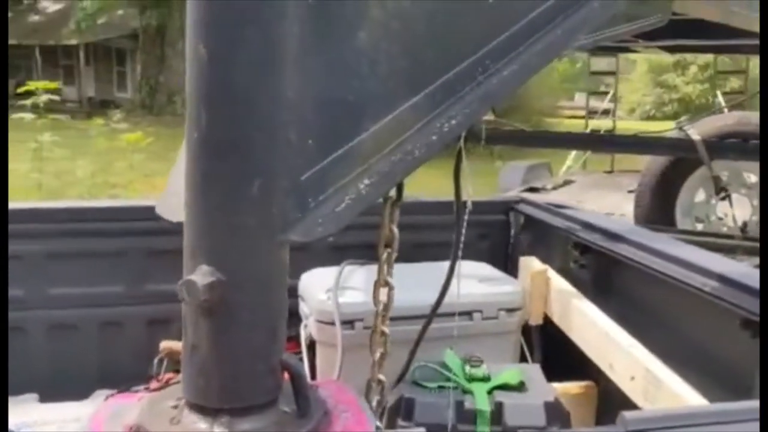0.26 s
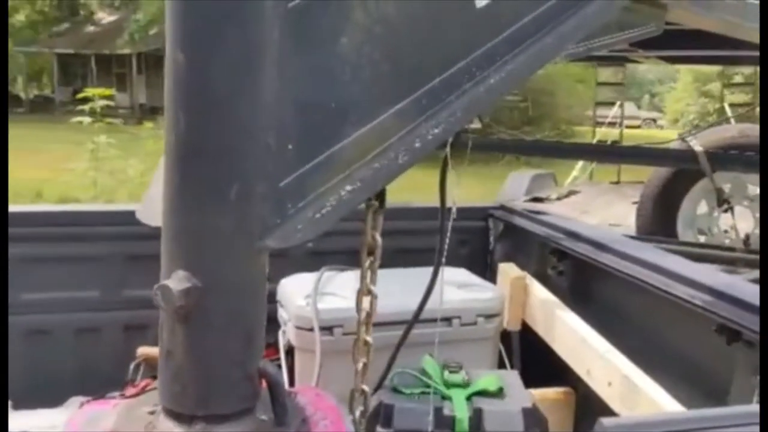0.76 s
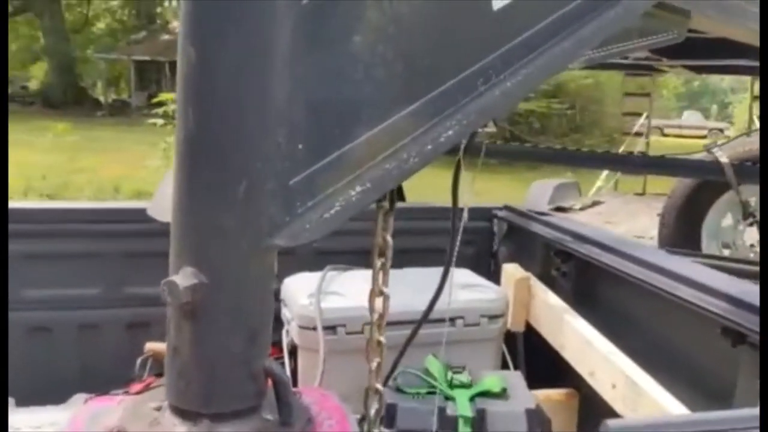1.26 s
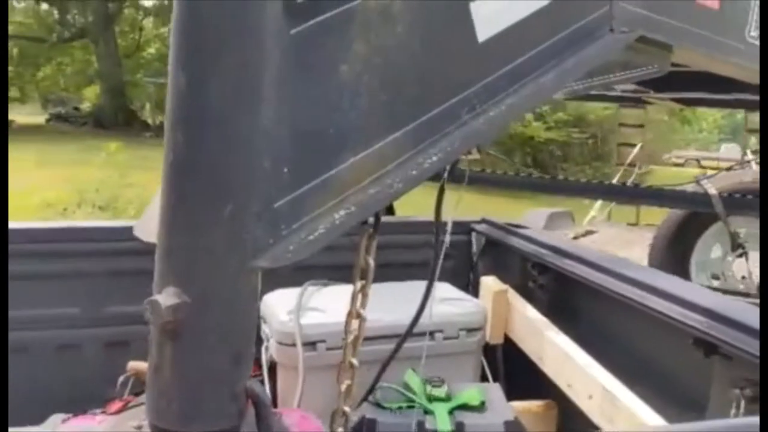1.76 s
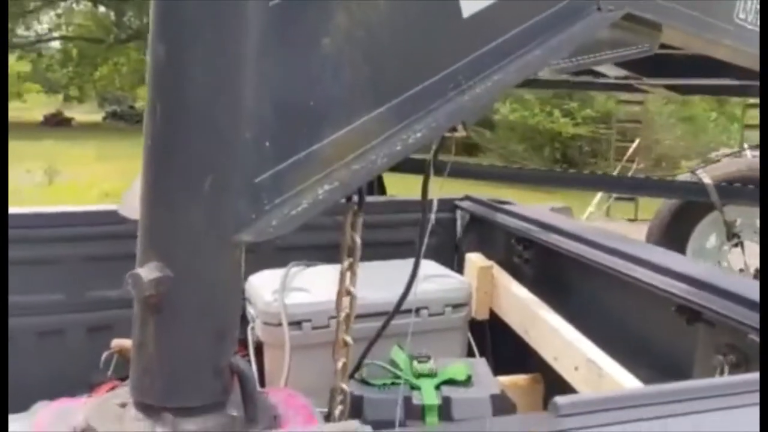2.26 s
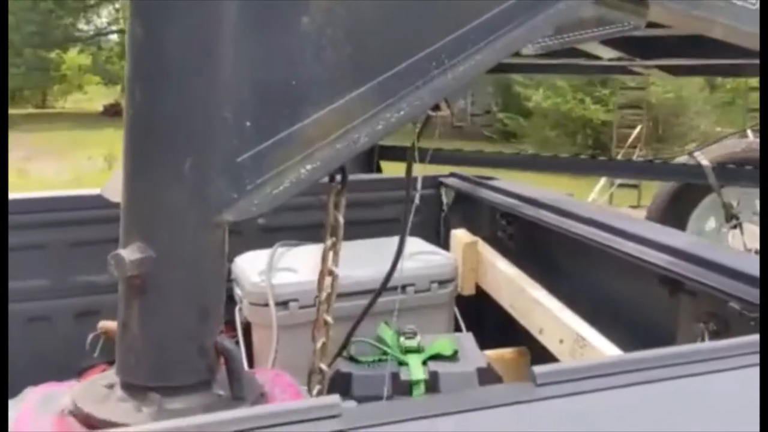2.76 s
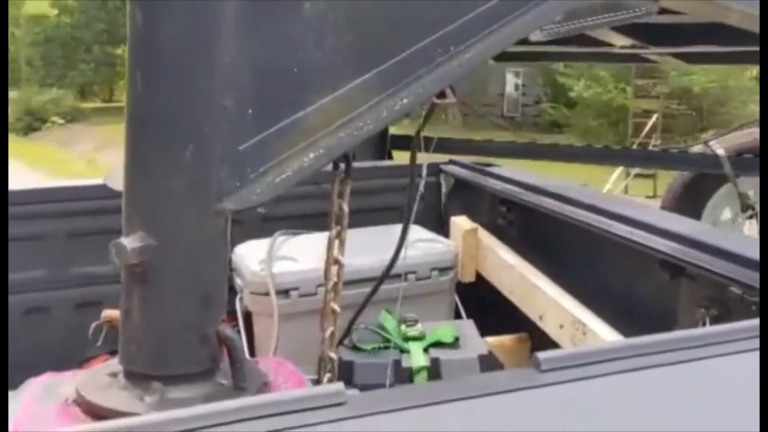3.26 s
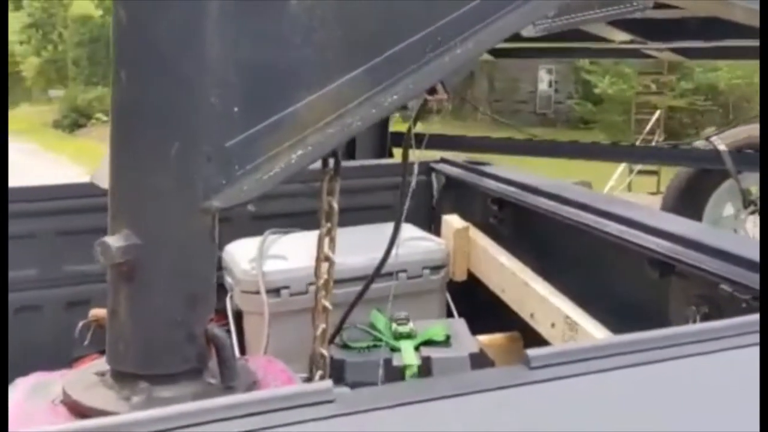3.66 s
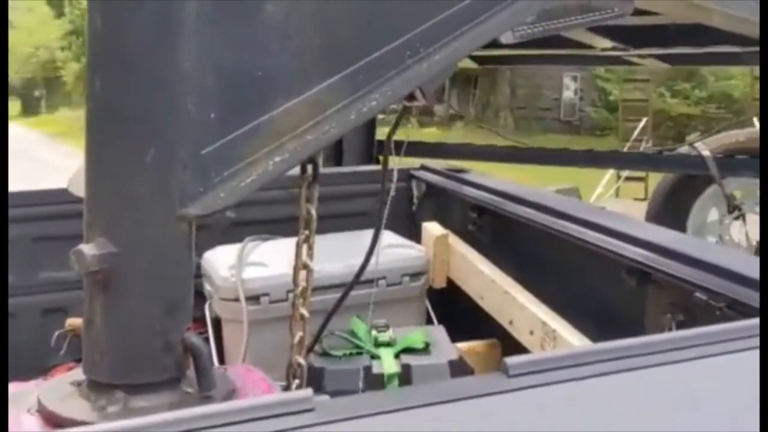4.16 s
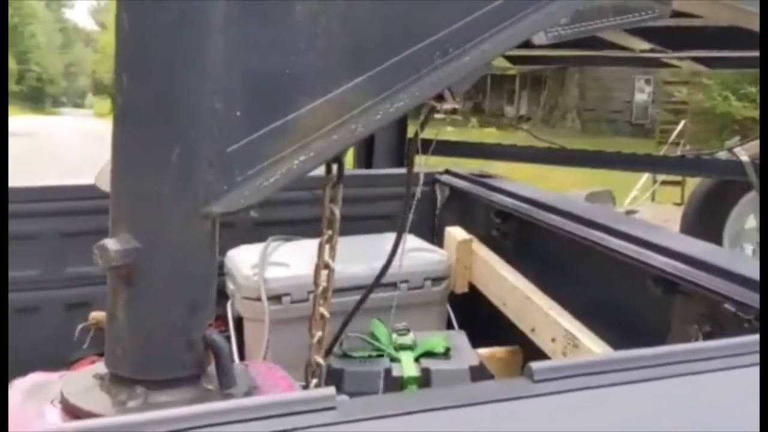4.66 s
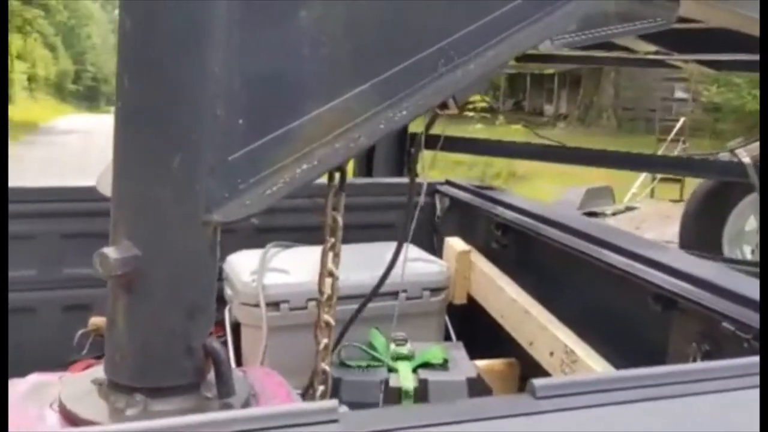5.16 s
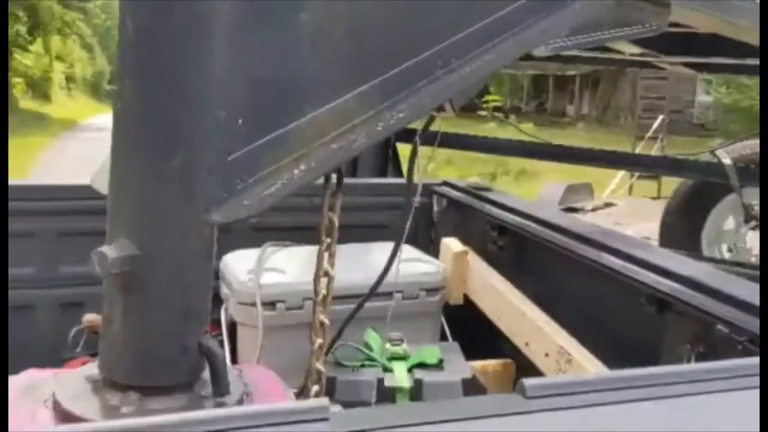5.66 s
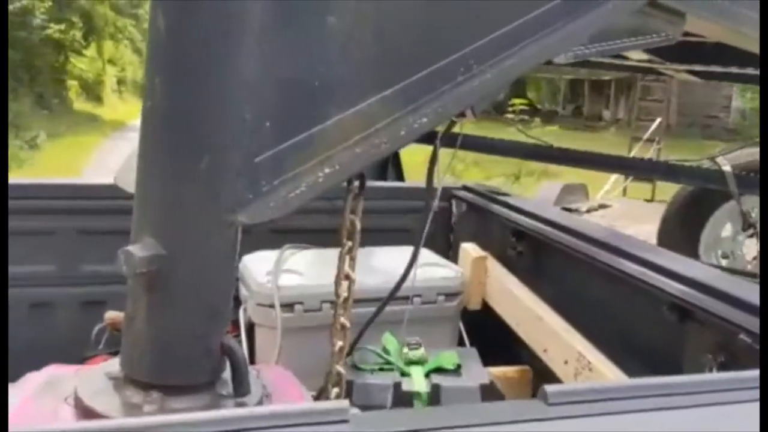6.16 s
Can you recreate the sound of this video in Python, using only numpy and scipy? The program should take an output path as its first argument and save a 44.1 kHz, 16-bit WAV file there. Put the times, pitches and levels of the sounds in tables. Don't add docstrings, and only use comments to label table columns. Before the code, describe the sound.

A truck tows a trailer down a lane: deep throbbing engine, tyre rumble, airy hiss, loose steel knocking and a brief high squeak.

```python
import sys
import numpy as np
from scipy import signal
from scipy.fft import rfft, irfft, next_fast_len
from scipy.io import wavfile
from scipy.ndimage import uniform_filter1d

SR = 44100
rng = np.random.default_rng(int(sys.argv[2]) if len(sys.argv) > 2 else 0)


def waveform_to_disk(signal):
    frames = np.transpose(np.atleast_2d(signal))
    scaled = np.clip(frames, -1, 1) * 32767
    samples = np.round(scaled).astype(np.int16)
    wavfile.write(sys.argv[1], SR, samples)


def decibels_to_gain(level_db):
    exponent = np.asarray(level_db, float) / 20
    return 10 ** exponent


N = 282681


def evened(x):
    return x / np.sqrt(np.mean(x ** 2) + 1e-20)


def read(points, hz):
    point_hz, value = np.transpose(points)
    return np.interp(np.log(hz + 1), np.log(point_hz + 1), value)


def play(rows):
    s, *columns = np.transpose(rows)
    t = np.arange(s[0], s[-1], 1 / SR)
    return s[0], [np.interp(t, s, column) for column in columns]


def add(mix, start_s, sound):
    part = mix[..., round(start_s * SR):][..., :sound.shape[-1]]
    part += sound[..., :part.shape[-1]]


def colour(points):
    log_gain = np.log(decibels_to_gain(read(points, abs(np.fft.fftfreq(4096, 1 / SR)))))
    return np.fft.ifft(np.exp(np.conj(signal.hilbert(log_gain)))).real[:2048]


def ring(modes, detune=0.96):
    t = np.arange(SR // 4) / SR
    return sum(decibels_to_gain(db - 60 * t / max(t60_s, .01)) * np.sin(2 * np.pi * hz * detune * t)
               for hz, db, t60_s in modes)


def wander(hz, count):
    r = np.exp(-2 * np.pi * hz / SR)
    drift = signal.lfilter([1], [1, -2 * r, r * r], rng.standard_normal(count + SR))
    return evened(drift[SR:])


# time in seconds, level over its mean in dB.
TYRE_CURVE = [(0.0, 1.5), (0.5, -0.5), (0.93, 1.5), (1.82, 0), (2.27, -2.5), (2.93, -3.5), (3.2, 0.5),
              (3.6, -1.5), (4.3, 0), (4.7, 3), (5.14, 1.5), (5.95, 2.5), (6.12, 1), (6.41, 3.5)]
# mean in dB, share of the tyre noise swing, slope in dB per octave of engine speed.
ROAD_LAYERS = [
    (-33, 0.31, 6.5),
    (-41, 0.76, 2),
    (-33.5, 0.93, 1),
]


def layers_db():
    tyres_db = play(TYRE_CURVE)[1][0]
    firing_hz = play(FIRING_CURVE)[1][0]
    octaves = np.log2(firing_hz / 52)
    return [db + share * tyres_db + per_octave_db * octaves for db, share, per_octave_db in ROAD_LAYERS]


# frequency in Hz, correlation -1 to 1.
LIKENESS = [(60, 1), (150, 0.47), (300, 0.81), (600, 0.88), (950, 0.97), (1300, 0.48), (1650, 0.92),
            (2200, 0.37), (5000, 0.13)]


def noise(spectrum, level_db, size, patchy_db, flicker_db):
    hop = size // 4
    frames, hz = N // hop + 5, np.fft.rfftfreq(size, 1 / SR)
    a, b, c, d, patches = rng.standard_normal((frames, len(hz), 5)).T
    patches = uniform_filter1d(patches, size=6, axis=0)
    patches = evened(uniform_filter1d(patches, size=12, axis=1))
    flicker = evened(uniform_filter1d(rng.standard_normal(frames), size=5))
    same = np.clip(read(LIKENESS, hz), -1, 1)[:, None]
    left = a + 1j * b
    right = same * left + np.sqrt(1 - same ** 2) * (c + 1j * d)
    gain_db = read(spectrum, hz)[:, None] + patchy_db * patches + flicker_db * flicker
    z = np.array([left, right]) * decibels_to_gain(gain_db)
    x = evened(signal.istft(z, nperseg=size, noverlap=size - hop)[1][:, :N])
    return x * decibels_to_gain(np.pad(level_db, (0, N), "edge")[:N])


# frequency in Hz, level in dB.
RUMBLE_SPECTRUM = [(25, -32), (38, -23.5), (65, 8), (95, -0.5), (140, -9), (190, -9.5), (230, -15.5),
                   (320, -13.5), (420, -28), (700, -64.5)]
ROAR_SPECTRUM = [(200, -12.5), (380, -0.5), (550, 2.5), (800, 0), (1050, 3.5), (1230, -5), (1400, 0.5),
                 (1620, -7), (1800, -4.5), (2400, -43)]
HISS_SPECTRUM = [(1500, -20), (1950, -2.5), (2500, 2.5), (3100, -6), (3500, -11), (4200, -12),
                 (5000, -15.5), (5700, -20.5), (6500, -25), (8000, -26.5), (10000, -21.5), (11000, -30),
                 (12600, -25), (13300, -66)]


def road():
    rumble_db, roar_db, hiss_db = layers_db()
    rumble = noise(RUMBLE_SPECTRUM, rumble_db + 5.0, size=4096, patchy_db=1.5, flicker_db=.5)
    roar = noise(ROAR_SPECTRUM, roar_db + 0.035, size=512, patchy_db=1.5, flicker_db=0.5)
    hiss = noise(HISS_SPECTRUM, hiss_db - 8.0, size=512, patchy_db=1.5, flicker_db=-0.12)
    return rumble + roar + hiss


# start in seconds, level in dB, frequency in Hz, t60 in seconds.
CARGO_THUDS = [(1.149, -34.5, 312, 0.17), (1.932, -34, 317, 0.11), (2.606, -37.5, 234.4, 0.16),
               (3.263, -27.5, 230, 0.089), (3.315, -36, 255, 0.094), (3.523, -37.5, 320, 0.16),
               (4.022, -34.5, 219.7, 0.085), (6.395, -22.5, 249, 0.039)]


def cargo():
    out = np.zeros((2, N))
    for s, level_db, hz, t60_s in CARGO_THUDS:
        thud = ring([(hz, 0, t60_s), (1.396 * hz, -5, 0.45 * t60_s), (2.9 * hz, -10, 0.83 * t60_s)])
        thud *= np.minimum(np.arange(len(thud)) / 85.0, 1)
        add(out, s, decibels_to_gain(level_db + 9.5) * np.array([thud, thud]))
    return out


# peak in dB, rise in seconds, hold in seconds, fall in dB/s, throb in dB.
SQUEAK_PARTIALS = [(-22.5, .012, 0.049, 260, 13.5), (-33.5, 0.028, 0.026, 110, 4),
                   (-51, 0.019, 0.021, 160, -3), (-54, 0.023, 0.0088, 172, 1)]
# gain in dB, phase in radians, fuzz 0-1.
SQUEAK_RIGHT_PORT = [(-4, -1.8, .15), (-5, 2.5, .45), (-2, .3, .8), (-2, .3, .9)]


def squeak():
    out, start_s, t = np.zeros((2, N)), 1.508, np.arange(0, .212, 1 / SR)
    slip_hz, sag_hz_per_s, shake_hz, shake_s = 2092, 250, 52, 0.015
    hz = slip_hz + sag_hz_per_s * (.05 - abs(t - .05))
    slack = np.sin(np.pi * shake_hz * (t - shake_s)) ** 2
    levels_db = []
    for db, rise_s, hold_s, fall, throb_db in SQUEAK_PARTIALS:
        rising_db = 25 * np.maximum(1 - t / rise_s, 0)
        falling_db = fall * np.maximum(t - rise_s - hold_s, 0)
        levels_db.append(db - rising_db - falling_db - throb_db * slack)
    turns = np.cumsum(hz * (1 + 0.0055 * wander(70., len(hz)))) / SR
    for k, (db, (right_db, phase, fuzz)) in enumerate(zip(levels_db, SQUEAK_RIGHT_PORT)):
        shake = decibels_to_gain(db) * (1 + fuzz * (wander(160., len(hz)) + 1j * wander(200.0, len(hz))))
        tone = shake * np.exp(2j * np.pi * (k + 1) * turns)
        right = decibels_to_gain(right_db) * tone * np.exp(1j * phase)
        add(out, start_s, np.array([tone.real, right.real]))
    scrape = signal.fftconvolve(rng.standard_normal((2, len(hz))), colour(CHAIN_SPECTRUM)[None], "same", axes=1)
    add(out, start_s, decibels_to_gain(levels_db[2] - 7.0) * evened(scrape))
    return out


# frequency in Hz, level in dB, t60 in seconds.
LATCH_MODES = [(2346, 3, .08), (2554, -4, 0.064), (1410, -3, .07), (1800, -8, .04)]
# start in seconds, level in dB.
LATCH_PINGS = [(0.028, -18), (0.037, -26), (0.674, -34.5), (0.7557, -28), (1.125, -24), (3.057, -33.5),
               (4.346, -33.5), (6.389, -27)]


def latch():
    out = np.zeros((2, N))
    ping = ring(LATCH_MODES) * np.minimum(np.arange(SR // 4) / 54.0, 1)
    for s, level_db in LATCH_PINGS:
        add(out, s, decibels_to_gain(level_db) * np.array([ping, ping]))
    return out


# frequency in Hz, level in dB, t60 in seconds.
HITCH_MODES = [(1450, -2, .025), (1650, -2, .025), (1850, -2, .025), (2220, -2, .03), (2500, -2, .03),
               (2760, 0, .03), (3020, 0, .03), (3250, -2, .03), (3630, -7, .025), (4150, -8, .025),
               (4650, -10, .02), (4950, -11, .02)]
BED_MODES = [(572, -8, 0.042), (794, -4, 0.081), (866, -1.5, 0.051), (992, -3.5, 0.023), (1159, 3.5, 0.035),
             (1330, -8, 0.059)]
# frequency in Hz, level in dB.
CHAIN_SPECTRUM = [(3500, -20), (5000, 0), (6200, -6), (7300, -1), (9000, -3), (10200, -1), (11000, -5),
                  (12500, -2), (13400, -15)]


def hit(level_db, body_db, tick_db, rattle_s, t60_s):
    t = np.arange(SR // 5) / SR
    clicks = rng.standard_normal((2, len(t))) * decibels_to_gain(4.3 * np.minimum(rng.exponential(1, len(t)), 4))
    clicks *= np.minimum(t / (.15 * rattle_s), 1)
    sharp = min(1, .009 / rattle_s)
    clicks[0, [8, 200]] = clicks[1, [20, 190]] = 20 * sharp, 14 * sharp
    clicks *= decibels_to_gain(-60 * np.maximum(t - rattle_s, 0) / max(t60_s, .01))
    scattered = clicks * decibels_to_gain(np.array([[0.], [-3.5]]))
    detune = rng.uniform(0.96, 1.04)
    clank_band = signal.butter(2, [1300, 5600], "band", fs=SR, output="sos")
    body_band = signal.butter(2, [500, 1800], "band", fs=SR, output="sos")
    clank = signal.sosfilt(clank_band, ring(HITCH_MODES, detune))
    body = signal.sosfilt(body_band, ring(BED_MODES, detune))
    parts = [(scattered, clank, 0), (clicks[[0, 0]], body, body_db + 5),
             (scattered, colour(CHAIN_SPECTRUM), tick_db + 5.5)]
    out = 0
    for source, shape, db in parts:
        rung = signal.fftconvolve(source, shape[None], axes=1)[:, :SR // 5]
        out = out + decibels_to_gain(level_db + db - 11) * rung / np.std(rung[0, :500])
    return out


# start in seconds, clank in dB, body and tick in dB re clank.
SINGLE_BLOWS = [(0.7567, -25.5, -6.5, -52), (1.125, -14, -12, -20.5), (1.1297, -15, -17, -30),
                (1.461, -21.5, -24, -51), (1.555, -21, -13.5, -32), (1.603, -23.5, -9, -36),
                (2.2918, -30, -2.5, -22), (3.0558, -25, 1.5, -52.5), (3.1512, -28, 0.5, -36),
                (3.2, -17.5, -9, -16.5), (3.256, -29.5, -1, -33), (4.347, -31, -30, -42),
                (6.4028, -11.5, -7.5, -25)]
CHAIN_TICKS = [(2.4672, -31.5, -4, -15), (4.143, -36.5, -32, -2), (4.6046, -33.5, -1, -13),
               (5.2308, -31.5, -32, -9), (6.086, -25, -9, -15)]
# start in seconds, clank in dB, body and tick in dB re clank, length in seconds.
CHATTERS = [(0.03, -12, -11, -49, 0.025), (0.1, -21.5, -7, -21, 0.0071), (0.694, -19, -9, -19.5, 0.011),
            (1.9396, -27.5, -18.5, -19, 0.0092), (1.974, -23, -13.5, -36, 0.027),
            (6.28, -47, -19, -19, 0.02), (6.296, -20.5, -21, -15.5, 0.012),
            (6.328, -14.5, -13, -18.5, 0.0093), (6.3859, -14.5, -3, -18, 0.029)]


def hitch():
    out, blow_s = np.zeros((2, N)), 0.0038
    for s, *levels_db in SINGLE_BLOWS:
        add(out, s, hit(*levels_db, blow_s, 0.12))
    for s, clank_db, body_db, tick_db, rattle_s in CHATTERS:
        t60_s = 0.17 - 0.04 * (clank_db + 20)
        add(out, s, hit(clank_db, body_db, tick_db, rattle_s, t60_s))
    for s, *levels_db in CHAIN_TICKS:
        add(out, s, hit(*levels_db, blow_s, 0.1))
    return out


# time in seconds, firing rate in Hz, level in dB.
FIRING_CURVE = [(0.0, 46.3, -24.5), (0.45, 46.1, -26.5), (0.73, 51.3, -20.5), (1.1, 52.2, -17),
                (1.75, 51.6, -17), (2.14, 43.5, -30), (2.4, 42.25, -32.5), (2.9, 41.64, -30),
                (3.14, 45.5, -23.5), (3.45, 47.9, -22), (4.03, 50, -22), (4.3, 54.95, -15.5),
                (4.59, 60.38, -15), (4.91, 63.54, -18.5), (5.35, 65.67, -19.5), (5.9, 66.7, -21.5),
                (6.3, 66.4, -19), (6.41, 62, -12.5)]
# time in seconds, depth in dB.
DRONE_FALTERS = [(5.44, 25), (5.59, 3), (5.69, 36), (6.09, 8), (6.18, 22)]
# multiple of the firing rate, level in dB re rumble, width in Hz.
UPPER_ORDERS = [(2, -9, 2.4), (2.75, -8, 16.2), (4, -16, 6.9), (5, -25.5, 5.7)]
# multiple of the firing rate, level in dB re rumble.
PANEL_ORDERS = [(1.38, 3), (1.65, 4), (2.0, -3), (2.33, 6)]


def engine():
    falter_s, panel_hz, panel_width_hz = 0.039, 94.8, 30
    out, (start_s, (hz, level_db)) = np.zeros(N), play(FIRING_CURVE)
    t = np.arange(len(hz)) / SR
    level_db = level_db - sum(db * np.exp(-((t - at) / falter_s) ** 2) for at, db in DRONE_FALTERS)
    turns = np.cumsum(hz * (1 + .005 * wander(6.0, len(hz)))) / SR
    drone = decibels_to_gain(level_db + 1.06 * wander(18.0, len(hz))) * np.sin(2 * np.pi * turns)
    add(out, start_s, np.sqrt(2) * drone)
    load_db = layers_db()[0]
    for k, db, width_hz in UPPER_ORDERS:
        a = 2 * np.pi * k * turns
        order = wander(width_hz, len(a)) * np.cos(a) + wander(width_hz, len(a)) * np.sin(a)
        add(out, start_s, decibels_to_gain(load_db + db) * order)
    for k, db in PANEL_ORDERS:
        caught = 1 / (1 + (2 * (k * hz - panel_hz) / panel_width_hz) ** 2) ** 2
        add(out, start_s, decibels_to_gain(load_db + db) * caught * np.sin(2 * np.pi * k * turns))
    return np.array([out, out])


def scene():
    return road() + cargo() + squeak() + latch() + hitch() + engine() * decibels_to_gain(2.0)


# frequency in Hz, gain in dB.
PORT_RESPONSE = [(40, -5.5), (150, -3), (350, 2.5), (1200, -1.5), (1800, 1), (3600, -3), (4800, 5),
                 (6000, 1.5), (12000, 0)]
# frequency in Hz, lag in radians.
PORT_LAG = [(0, -0.5), (1120, 0.53), (1550, -2), (1810, -3.0), (2410, -1.55), (2760, 2.5), (3530, 7.5),
            (5000, 9), (5680, 13.5), (6460, 15), (7240, 18), (10100, 21), (11500, 33.5), (12800, 24.5)]


def right_port(x):
    port_hz, width_hz, port_db = 2500, 300, 15.5
    size = next_fast_len(N + SR)
    hz = np.fft.rfftfreq(size, 1 / SR)
    cavity = decibels_to_gain(port_db) / (1 + 1j * (hz ** 2 - port_hz ** 2) / (hz * width_hz + 1))
    response = abs(1 + cavity) * decibels_to_gain(read(PORT_RESPONSE, hz)) * np.exp(-1j * read(PORT_LAG, hz))
    return irfft(rfft(x, size) * response, size)[:N]


# frequency in Hz, level in dB re usual share.
MUTE_THRESHOLD = [(1300, -30), (1700, -1.6), (2200, -20), (3600, -1.8), (4600, -6), (6500, -.6), (9000, -2),
                  (12000, .6)]


def gate(x):
    hz, _, z = signal.stft(np.array([x[0] + x[1], x[0] - x[1]]) / 2, SR, nperseg=1024)
    power = uniform_filter1d(uniform_filter1d(abs(z) ** 2, size=7, axis=1), size=4, axis=2)
    share = power / (np.median(power, axis=2, keepdims=True) + 1e-20)
    treble = share[:, (hz > 3000) & (hz < 12000)]
    share /= np.clip(np.median(treble, axis=1, keepdims=True), .1, 1.2)
    weak = share < decibels_to_gain(2 * read(MUTE_THRESHOLD, hz))[:, None]
    mid, side = signal.istft(z * np.where(weak, decibels_to_gain(-36), 1), SR, nperseg=1024)[1][:, :N]
    return np.array([mid + side, mid - side])


def band_limit(x):
    return signal.sosfilt(signal.butter(12, 13300, fs=SR, output="sos"), x)


def record(dry):
    mix = gate(np.array([dry[0], right_port(dry[1])]))
    return band_limit(mix)


dry = scene()
out = record(dry)
waveform_to_disk(out)
```